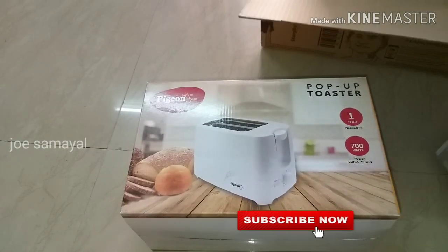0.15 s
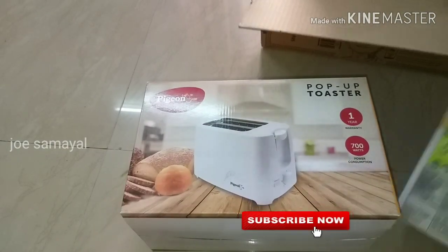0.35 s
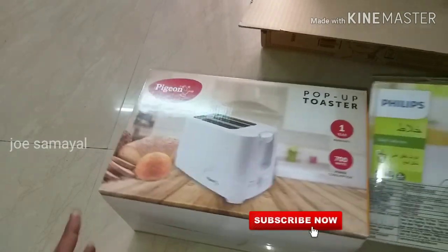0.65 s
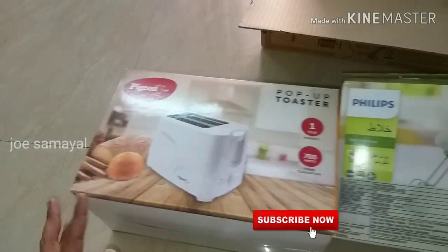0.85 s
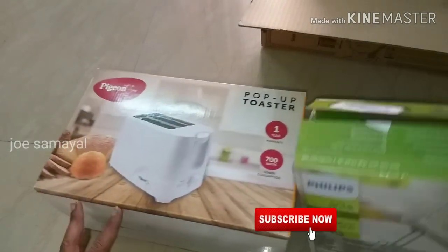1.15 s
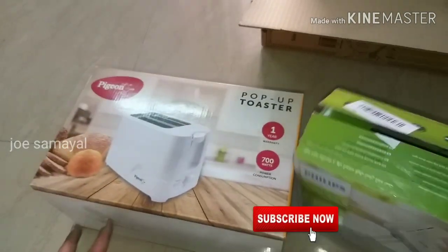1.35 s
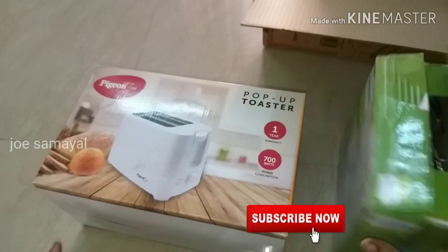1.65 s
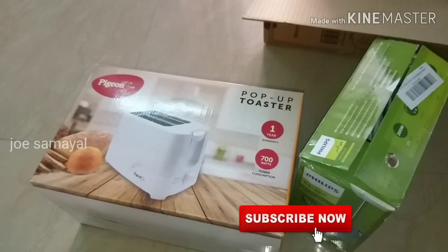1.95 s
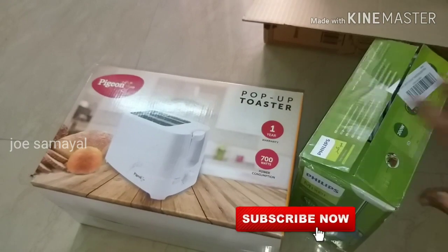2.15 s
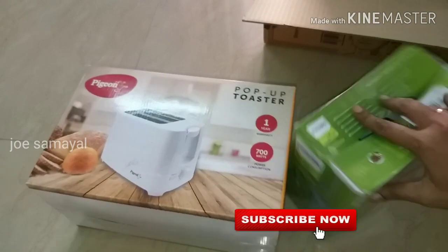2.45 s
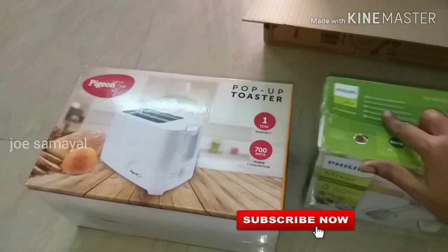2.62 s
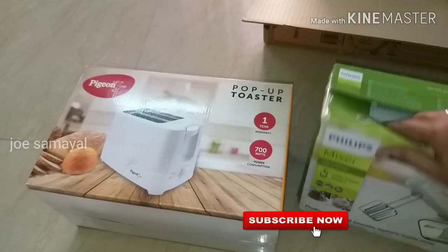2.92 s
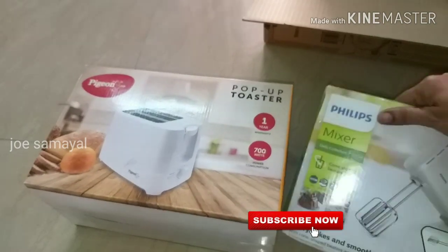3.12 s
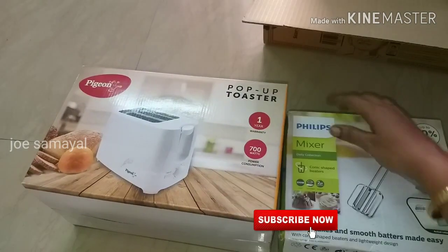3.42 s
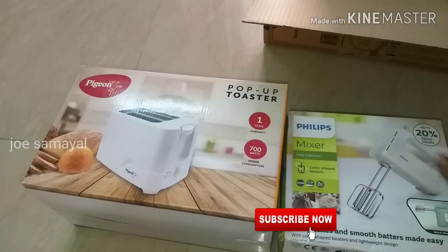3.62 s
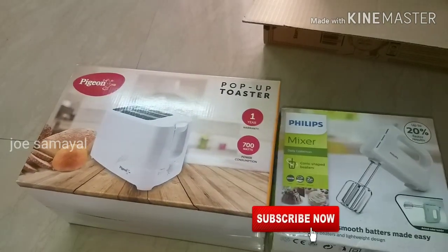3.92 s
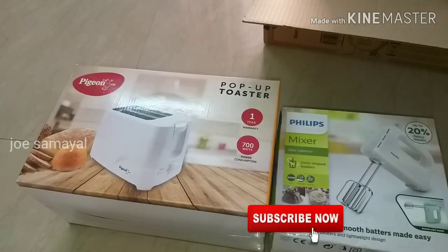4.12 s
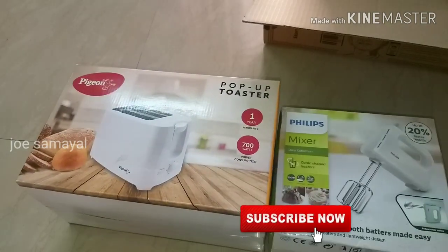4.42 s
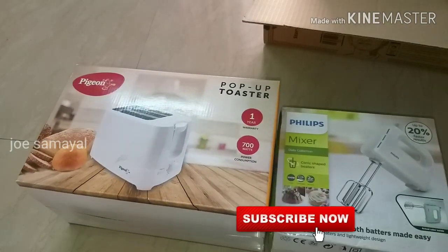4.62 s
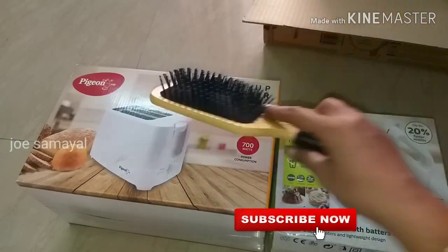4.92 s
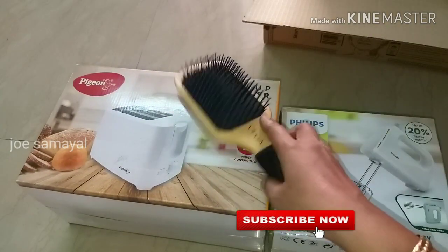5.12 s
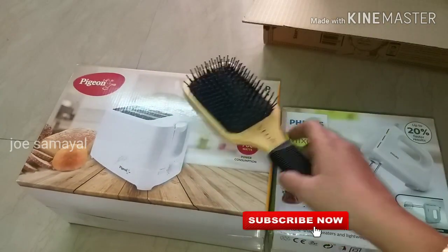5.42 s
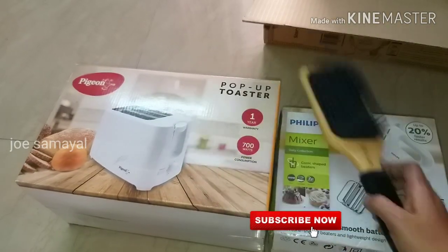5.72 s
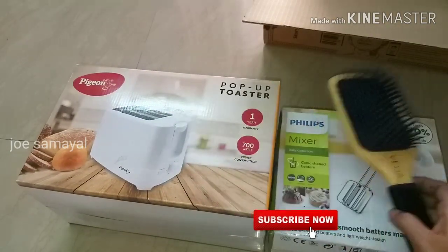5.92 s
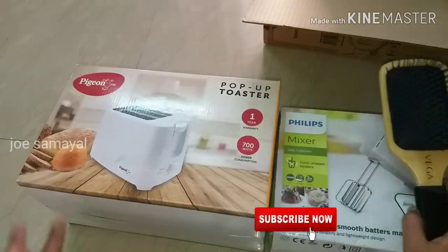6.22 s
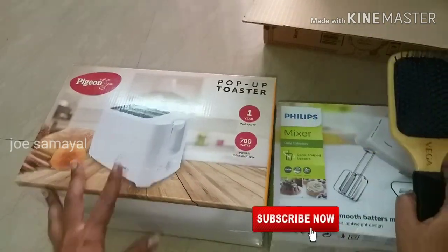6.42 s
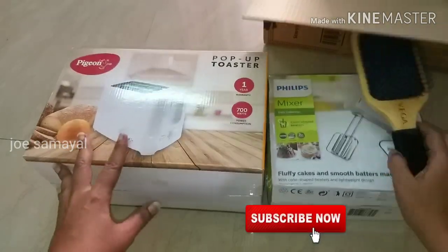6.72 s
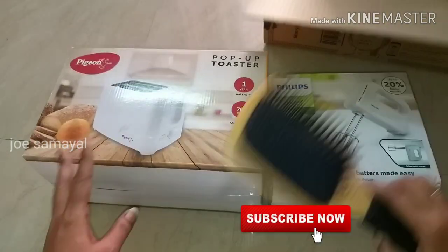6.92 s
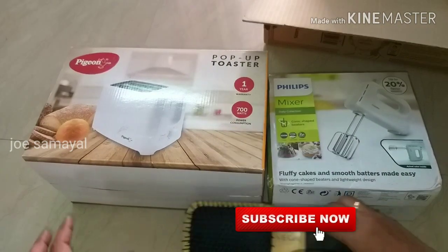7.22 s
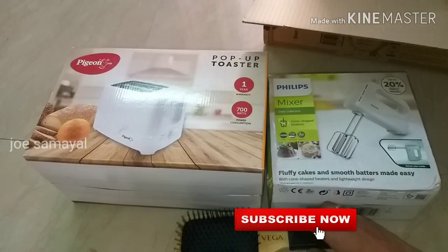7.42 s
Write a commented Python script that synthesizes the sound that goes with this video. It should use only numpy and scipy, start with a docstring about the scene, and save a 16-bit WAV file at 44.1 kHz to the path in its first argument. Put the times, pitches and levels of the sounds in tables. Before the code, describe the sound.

A nearby microphone catches dry cardboard friction on hard tiles, broken by bright ticks and boxy knocks, busiest in the first three and a half seconds. Thin steel parts rattle faintly within a box. Things go nearly silent, then come hard wooden clicks, one loud rap on card, and another gritty scrape before a hairbrush drops and rocks to rest. The bare room adds a short live echo over low hum.

```python
"""Hissing and rasping edges are heard first, as two cardboard cartons are pushed, turned and tipped on tiles.
Friction is shaped noise with gliding groans; flaps tick, card slaps and hollows boom as struck bodies.
Steel beaters jingle inside one carton as damped sines. A wooden hairbrush is picked up, rapped on a carton
(a faint squeal, a tone fraying into noise, follows) and laid on the floor with a clatter of wooden modes.
A bare room answers with diffuse decaying noise and standing waves, over quiet air and a faint motor hum."""
import sys
import numpy as np
from scipy import signal
from scipy.fft import rfft, irfft, next_fast_len
from scipy.io import wavfile
from scipy.ndimage import uniform_filter1d, map_coordinates

SR = 44100
rng = np.random.default_rng(int(sys.argv[2]) if len(sys.argv) > 2 else 0)


def output_pcm(signal):
    """Save a mono or channel-first signal as 16-bit PCM at the path in sys.argv[1].

    Samples are clipped to [-1, 1] before scaling.
    """
    pcm = np.clip(np.atleast_2d(signal).T, -1, 1) * 32767
    wavfile.write(sys.argv[1], SR, np.round(pcm).astype(np.int16))


N = 333396
HIT = 4096  # samples in one impulse response
TOP_HZ = 15650  # upper band limit

# All event and mode levels are relative: each source adds its own layer gains.
# Long slides over the tiles, one curve each.
# Each row: time in seconds, hiss of the face in dB, rasp of the edge in dB.
SLIDES = [
    [(0, -46, -46), (0.09, -49.5, -50.5), (0.16, -41, -47.5), (0.22, -44, -52.5), (0.255, -53.5, -49.5),
     (0.32, -56, -53), (0.38, -62, -69)],
    [(0.54, -46.5, -50), (0.6, -54.5, -53.5), (0.67, -53, -54.5), (0.78, -49.5, -53), (0.9, -47.5, -53.5),
     (1.12, -44.5, -50.5), (1.29, -52, -53), (1.38, -48, -52.5), (1.49, -42.5, -53)],
    [(2.39, -51.5, -49), (2.425, -41.5, -39.5), (2.52, -36.5, -43), (2.595, -37, -45.5), (2.63, -41, -43),
     (2.7, -44, -47.5), (2.75, -55.5, -57), (2.8, -65.5, -61)],
    [(3.77, -57.5, -65), (3.84, -58.5, -58), (3.92, -49.5, -55), (3.99, -57.5, -60.5), (4.08, -79.5, -83.5)],
    [(6.27, -77, -75), (6.32, -58.5, -58.5), (6.41, -58.5, -63), (6.49, -43.5, -47), (6.69, -41.5, -49),
     (6.74, -47, -48), (6.81, -41, -34), (6.86, -57.5, -53), (6.97, -74.5, -77)],
]
# Short scuffs as a carton or the brush is nudged, tipped or gripped.
# Each row: start in seconds, length in seconds, hiss in dB, rasp in dB, rumble in dB.
SCUFFS = [(0.0, 0.094, -56, -59, -48.5), (0.383, 0.052, -43.5, -51.5, -53), (.47, 0.048, -46.5, -45, -46),
          (0.683, 0.11, -51.5, -58.5, -55.5), (0.906, 0.039, -55.5, -66, -53),
          (1.157, 0.029, -41.5, -44.5, -55), (1.496, 0.056, -35.5, -36.5, -46),
          (1.537, 0.12, -39.5, -45, -52.5), (1.687, 0.046, -35.5, -41, -43.5),
          (1.739, 0.08, -42.5, -46, -47), (1.868, 0.046, -49, -47, -40.5),
          (2.296, 0.066, -46, -56.5, -40.5), (2.801, 0.048, -56, -53, -50.5),
          (2.943, 0.062, -42, -40.5, -43), (3.061, 0.071, -53.5, -68, -59.5),
          (3.104, 0.069, -43, -47, -49.5), (3.183, 0.15, -53, -54, -64), (3.338, 0.07, -44.5, -50.5, -45),
          (3.41, 0.057, -45.5, -44, -37.5), (3.774, 0.092, -75.5, -67, -51),
          (4.589, 0.14, -68, -90.5, -80.5), (5.044, 0.064, -69, -46.5, -40.5),
          (5.435, .03, -63, -62.5, -80), (5.785, 0.043, -59, -61.5, -46), (6.421, 0.061, -55, -73, -57.5),
          (7.294, 0.045, -54.5, -42.5, -48)]
# Corners groan and squeak as the cartons pivot.
# Each row: start in seconds, length in seconds, pitch in Hz, glide in Hz per second, level in dB.
GROANS = [(0.388, 0.1, 720, 200, -60.5), (.6, 0.12, 834, -2, -64), (1.2, 0.04, 760, -500, -60),
          (1.25, .018, 900, -1000, -54), (1.303, .042, 733, 1000, -51.5), (1.43, 0.058, 802, -300, -57),
          (1.7, .025, 1620, -2000, -50), (1.738, 0.0194, 5000, -3000, -47),
          (1.803, 0.025, 1600, -36000, -49.5), (2.402, 0.021, 3260, -3500, -45)]
# The sharpest snaps of the flaps. Each row: start in seconds, level in dB.
TICKS = [(0.0683, -23), (0.274, -26.5), (0.493, -22), (0.509, -16.5), (0.615, -27), (0.634, -26.5),
         (0.707, -23.5), (1.189, -17), (1.718, -14), (1.8184, -21.5), (2.311, -27.5), (2.551, -23),
         (2.583, -19), (2.9, -19.5), (6.495, -27), (6.791, -25), (6.88, -33), (7.485, -27.5)]
# Blows on the cartons.
# Each row: start in seconds, slap in dB, hollow boom in dB, panel in dB, pitch factor of the hollow.
KNOCKS = [(0.482, -48, -47, -52, 0.96), (1.189, -43, -48, -44, 1.08), (1.5138, -38.5, -43.5, -41.5, 0.7),
          (1.5279, -25.5, -41.5, -52, .9), (1.837, -28.5, -37.5, -38.5, 1.01),
          (1.902, -42.5, -46, -43, 1.33), (2.319, -26.5, -31.5, -33.5, 1.17),
          (2.328, -24.5, -40.5, -34.5, 1.05), (2.835, -24.5, -45, -39, 1.2), (2.8531, -15.5, -27, -29, 1.1),
          (2.899, -14, -30, -26, 0.95), (2.997, -34, -45, -39.5, 0.96), (3.157, -34, -64, -40, 0.89),
          (3.3472, -26, -57, -43, 0.93), (3.368, -34, -37, -49, 1.17), (3.402, -30.5, -45, -50.5, 1.17),
          (3.428, -26, -39, -36, 1.11), (3.452, -27.5, -34, -33.5, 1.41), (3.695, -46.5, -67, -72, 1.2),
          (3.7672, -46.5, -48.5, -66.5, 0.85), (5.0491, -23.5, -35.5, -44.5, 1.05),
          (5.1757, -8.5, -25.5, -26, 1.15), (5.811, -41, -39.5, -50, .85), (6.296, -38.5, -69.5, -67, 0.96),
          (6.435, -44.5, -46.5, -74, 0.86), (7.1285, -25.5, -33, -45.5, 1.24),
          (7.159, -33.5, -46, -47, 1.15), (7.197, -35.5, -41.5, -49.5, 1.05),
          (7.29, -44.5, -39.5, -43, 1.27)]
# A whole face of a carton gives way. Each row: start in seconds, level in dB, pitch factor.
THUDS = [(0.712, -46, .8), (1.771, -33, 0.63), (1.84, -39, 1.09), (5.179, -17.5, 1.04)]
# The beaters touch inside the carton. Each row: start in seconds, level in dB, pitch factor.
JINGLES = [(1.748, -41, 1.1), (1.9, -28.5, 1.04), (2.312, -40, .95), (3.452, -47, 1.12), (5.815, -52, 1.04)]
# An edge digs in and jumps free. Each row: start in seconds, level in dB.
SLIPS = [(2.559, -29), (2.568, -30.5), (2.594, -31), (6.718, -37.5), (6.729, -33), (6.753, -32.5),
         (6.767, -31.5), (6.778, -28.5), (6.803, -29), (6.8183, -30), (6.8214, -25.5)]
# The hairbrush strikes the floor or a carton. Each row: start in seconds, click in dB, handle in dB,
# handle pitch factor, paddle in dB, paddle pitch factor.
CLACKS = [(4.271, -47.5, -48.5, 1.03, -40.5, 0.8), (4.299, -46.5, -43.5, 1, -40, 0.82),
          (4.336, -16, -15, 0.98, -28.5, 0.84), (4.3465, -16.5, -19, 0.98, -32.5, 1),
          (5.0487, -30.5, -38, 0.97, -48, 1), (5.1757, -12, -17.5, 1.04, -39, 0.66),
          (7.307, -28, -46, 0.76, -27, 1), (7.323, -29.5, -41, .97, -30, 0.9),
          (7.3517, -9.5, -12, 0.99, -12.5, 0.95), (7.365, -31, -22.5, .97, -30, 1),
          (7.3731, -19, -20.5, 0.88, -17, 1), (7.451, -37.5, -37, 0.92, -30.5, 1),
          (7.458, -28, -25.5, 0.86, -32.5, 0.94)]
# A faint squeal that sinks and frays.
# Each row: time in seconds, pitch in Hz, level in dB, noisy share from 0 to 1.
SQUEAL = [(5.38, 2045, -75, .2), (5.41, 2040, -65, .2), (5.45, 2035, -60, .3), (5.47, 2060, -63, .9),
          (5.51, 2020, -62, .8), (5.57, 1980, -70, .8), (5.63, 1900, -73, .9), (5.74, 1870, -88, .9)]

# Resonances of the carton's hollow and panels, and of the brush's handle.
# Each row: centre in Hz, width in Hz, level in dB.
HOLLOW_MODES = [(167, 48, 4), (250, 97, 3.5), (367, 75, 1)]
PANEL_MODES = [(434, 130, -5.5), (731, 80, 4), (980, 81, -8.5)]
HANDLE_MODES = [(2750, 160, 6.5), (4130, 330, 6.5), (5530, 300, -3), (7300, 550, -6), (9200, 1100, -14)]
# The beaters' wires. Each row: pitch in Hz, level in dB, time to fall 60 dB in seconds.
STEEL_MODES = [(2000, -2, .08), (2830, -4, .06), (3806, -12, .06), (4620, -10, .06), (4860, -2, .06),
               (6514, -3, .06), (7950, -6, .07), (8810, 1, .07), (9496, -2, .07), (11700, -5, .06),
               (13400, -9, .05)]
# A fan motor. Each row: pitch in Hz, level in dB.
HUM = [(118.4, -72.5), (301.5, -81.5)]
# Standing waves between the walls. Each row: pitch in Hz, level in dB against the diffuse answer.
ROOM_MODES = [(166, -26), (243, -30.5), (297, -29.5), (356, -28), (420, -30.5), (738, -28)]
# Decay of the room. Each row: frequency in Hz, time to fall 60 dB in seconds.
ROOM_DECAY = [(120, 0.49), (400, 0.44), (1200, 0.44), (4000, 0.41), (8000, 0.41), (15000, 0.3)]
# Bands in which one channel is the stronger.
# Each row: centre in Hz, width in Hz, share of the gain (positive is left).
LEAN_BANDS = [(1900, 67, 0.41), (9840, 720, -0.15)]

# Spectra of friction: face, edge and panels. Each row: frequency in Hz, relative density in dB per Hz.
HISS = [(800, -23), (2500, -15), (4800, 0.5), (6500, -1), (9000, 0.5), (12000, 2), (15500, -1.5)]
RASP = [(400, -16), (850, -3), (1300, -2), (1850, 1.5), (2400, -1), (3400, -0.5), (4600, -3), (7000, -29.5)]
RUMBLE = [(30, -16.5), (70, -18), (110, -5.5), (170, -1.5), (330, 1.5), (480, -6), (750, -6), (1100, -11.5),
          (2200, -37)]
# Spectra of impact: flap, card, giving face, hard contact and hollow paddle.
# Each row: frequency in Hz, relative density in dB per Hz.
SNAP = [(400, -24.5), (1500, -14.5), (4500, 8.5), (8000, 3.5), (12000, 8), (16000, 2.5)]
SLAP = [(300, -21.5), (600, -3.5), (1000, -0.5), (1400, 2.5), (1900, 5), (2300, 0), (2800, -3), (3200, -6),
        (4100, -6.5), (5500, -15), (9000, -14.5), (15000, -22.5)]
THUD = [(30, -29.5), (60, -14.5), (110, -3), (170, 1.5), (290, -2.5), (450, -11.5), (900, -32),
        (3000, -68.5)]
CLICK = [(250, -22), (500, -5), (1000, -1.5), (1900, 1), (2300, -19.5), (3000, 1), (6000, -0.5),
         (10000, -4.5), (15000, -15)]
PADDLE = [(200, -34), (450, -13.5), (640, -20.5), (800, -7), (950, -2.5), (1050, -5), (1180, -1),
          (1320, 0.5), (1600, -13), (1870, -10), (2300, -18.5), (5000, -45.5)]
# Spectrum of the quiet room air. Each row: frequency in Hz, relative density in dB per Hz.
QUIET = [(15, -57), (25, -13), (140, 2.5), (305, -14.5), (433, -21), (509, -13.5), (631, -21), (804, -15.5),
         (945, -17), (2560, -24), (3260, -24.5), (6050, -33.5), (15500, -30.5)]

SCUFF_ATTACK_S, SCUFF_FALL_DB_PER_S, STROKE_TAIL_S = 0.02, 258.5, 0.25
RUMBLE_DB = -13  # rumble curve of a slide against its rasp curve, before the layer gains
GROAN_WANDER = 0.0506  # random pitch wander as a share of the pitch
CATCHES_PER_S = 77  # mean rate at which an edge catches and lets go
GRIT_PER_S, GRIT_DB = 7, -2.5  # mean rate of specks; mean level against the face's hiss curve
BOOM_LAG_S = 0.002  # the air inside answers after the card
# The brush rocks to rest: mean gap between contacts, first contact before layer gains, loss per contact.
ROCK_S, ROCK_GAP_S, ROCK_DB, ROCK_LOSS_DB = 7.392, 0.01, -28, 4


def amp(db):
    """Logarithmic level: decibels become an amplitude ratio."""
    return 10 ** (np.asarray(db) / 20)


def unit(x):
    """Mean power: a signal is scaled to rms 1."""
    return x / np.sqrt(np.mean(x ** 2) + 1e-20)


def along(points, hz):
    """Logarithmic frequency: (Hz, value) points are interpolated on a log axis."""
    f, v = np.transpose(points)
    return np.interp(np.log(hz + 1), np.log(f + 1), v)


def wobble(rate):
    """Band-limited fluctuation: a smooth random curve with rate knots a second."""
    knots = rng.standard_normal(int(N * rate / SR) + 4)
    return map_coordinates(knots, [np.arange(N) * rate / SR])


def filtered(x, response):
    """Linear filtering: the spectrum of x is multiplied by a response of frequency."""
    n = x.shape[-1]
    m = next_fast_len(n + 2 * HIT)
    return irfft(rfft(x, m) * response(np.fft.rfftfreq(m, 1 / SR)), m)[..., :n]


def coloured(x, spectrum):
    """Spectral shaping: x is weighted by a spectrum and brought to rms 1."""
    return unit(filtered(x, lambda hz: amp(along(spectrum, hz))))


def pulse(spectrum):
    """Minimum phase: the shortest causal pulse of a given spectrum, by folding its cepstrum."""
    cepstrum = irfft(np.log(amp(along(spectrum, np.fft.rfftfreq(HIT, 1 / SR)))))
    cepstrum[1:HIT // 2] *= 2
    cepstrum[HIT // 2 + 1:] = 0
    return irfft(np.exp(rfft(cepstrum)))


def ring(modes, detune, scatter_db=3.0):
    """Modal decay: damped modes, whose pitches and strengths vary with the point of contact."""
    t = np.arange(HIT) / SR
    out = np.zeros(HIT)
    for k, (hz, width, db) in enumerate(modes):
        sign = (-1) ** k  # neighbouring modes swing against each other
        strength = amp(db + scatter_db * rng.normal()) * width
        pitch = hz * (1 + detune * rng.normal())
        out += sign * strength * np.exp(-np.pi * width * t) * np.cos(2 * np.pi * pitch * t)
    return out


def struck(body, tail, crush, life):
    """Impact excitation: a blow and brief crushing drive a body, whose colour the room carries on."""
    fibres = rng.standard_normal(HIT) * np.exp(-np.arange(HIT) / SR / life)
    force = crush * fibres / np.linalg.norm(fibres)
    force[0] += 1
    direct = signal.fftconvolve(force, body)[:HIT]
    sound = signal.fftconvolve(body / np.linalg.norm(body), tail)
    sound[:HIT] += direct / np.linalg.norm(direct)
    return sound * np.sqrt(SR / 1000)  # direct part: the energy of 1 ms at rms 1


def room_tail(build=0.0032):
    """Reverberation: diffuse noise decaying by frequency, with standing waves, at energy 1."""
    hz, _, z = signal.stft(rng.standard_normal(SR * 3 // 4), SR, nperseg=256)
    frame_s = _
    decay = amp(-60 * frame_s / along(ROOM_DECAY, hz)[:, None])
    diffuse = signal.istft(z * decay, SR, nperseg=256)[1]
    t = np.arange(len(diffuse)) / SR
    waves = np.zeros(len(t))
    for f, db in ROOM_MODES:
        fall = amp(-60 * t / along(ROOM_DECAY, f))
        waves += amp(db) * unit(fall * np.sin(2 * np.pi * (f * t + rng.random())))
    onset = 1 - np.exp(-(t / build) ** 2)
    tail = (unit(diffuse) + waves) * onset
    return tail / np.linalg.norm(tail)


def in_room(x, wet_db):
    """Superposition of paths: direct sound plus the walls' answer."""
    path = amp(wet_db) * room_tail()
    path[0] = 1
    return signal.fftconvolve(x, path)


def add(track, s, sound):
    """Superposition in time: a sound is mixed in at s seconds."""
    part = track[max(0, round(s * SR)):][:len(sound)]
    part += sound[:len(part)]


def slide_level(column):
    """Contact envelope: gain per sample from one dB column of the slides, silent between them."""
    t = np.arange(N) / SR
    gain = np.zeros(N)
    for curve in SLIDES:
        points = np.array(curve)
        gain += amp(np.interp(t, points[:, 0], points[:, column], left=-120, right=-120))
    return uniform_filter1d(gain, size=300)


def stroke(length):
    """Transient contact: a short rub with a quick attack, a hold and a release."""
    t = np.arange(int((length + STROKE_TAIL_S) * SR)) / SR
    release = amp(-SCUFF_FALL_DB_PER_S * np.maximum(t - length, 0))
    return np.clip(t / SCUFF_ATTACK_S, 0, 1) * release


def rubbing():
    """Incoherent addition: the powers of slides and scuffs add in hiss, rasp and rumble."""
    face, edge = slide_level(column=1), slide_level(column=2)
    power = np.array([face, edge, amp(RUMBLE_DB) * edge]) ** 2
    for s, length, *levels in SCUFFS:
        for layer, db in zip(power, levels):
            add(layer, s, (amp(db) * stroke(length)) ** 2)
    return np.sqrt(power)


def friction(rate, grit, flutter_db):
    """Dry friction: countless tiny slips and larger grains (rate a second) under unsteady pressure."""
    grains = (rng.random(N) < rate / SR) * rng.standard_normal(N)
    tiny_slips = rng.standard_normal(N)
    return (tiny_slips + grit * unit(grains)) * amp(flutter_db * wobble(70))


def catches(face, edge, scatter_db=3, wet_db=-5):
    """Stick-slip of an edge: a crackle that grows as the carton tilts off its face."""
    tilt = edge ** 2 / (edge ** 2 + face ** 2)
    releases = (rng.random(N) < CATCHES_PER_S / SR) * amp(scatter_db * rng.standard_normal(N))
    crackle = struck(pulse(RASP), amp(wet_db) * room_tail(), crush=2.5, life=0.002)
    return signal.fftconvolve(releases * edge * tilt, crackle)[:N]


def groans(fuzz=0.32, flutter_db=2.5):
    """Uneven stick-slip of a corner: a fuzzy gliding tone whose width is a share of its pitch."""
    out = np.zeros(N)
    for s, length, hz, glide, db in GROANS:
        envelope = stroke(length)
        wander, drift_a, drift_b = rng.standard_normal((3, HIT))
        t = np.arange(len(envelope)) / SR
        glided = hz + glide * np.minimum(t, length)
        pitch = glided * (1 + GROAN_WANDER * map_coordinates(wander, [t * 45]))
        cycles = np.cumsum(pitch) / SR
        a = map_coordinates(drift_a, [cycles * fuzz])
        b = map_coordinates(drift_b, [cycles * fuzz])
        tone = a * np.cos(2 * np.pi * cycles) + b * np.sin(2 * np.pi * cycles)
        add(out, s, amp(db) * envelope * tone)
    return amp(flutter_db * wobble(35)) * out


def sliding(rasp_db=-2.0, rumble_db=-2.5, groan_db=5.0):
    """Sliding friction: the face hisses, edges rasp and catch, panels rumble and corners groan."""
    face, edge, panels = rubbing()
    hiss = face * coloured(friction(rate=700, grit=0.63, flutter_db=0.94), HISS)
    rasp = amp(rasp_db) * edge * coloured(friction(rate=240, grit=0.54, flutter_db=1.14), RASP)
    rumble = amp(rumble_db) * panels * coloured(friction(rate=140, grit=0.79, flutter_db=0.0), RUMBLE)
    dry_rub = hiss + rasp + rumble + amp(groan_db) * groans()
    return in_room(dry_rub, wet_db=-11.5)[:N] + catches(face, edge)


def background(air_db=-66):
    """Steady ambient noise: shaped room air and the slowly wavering tones of a motor hum."""
    t = np.arange(N) / SR
    hum = np.zeros(N)
    for hz, db in HUM:
        gain = amp(db + 1.9 * wobble(3.6)) * np.sqrt(2)  # peak from rms
        hum += gain * np.sin(2 * np.pi * hz * t + 0.4 * wobble(3.9))
    return hum + amp(air_db) * coloured(rng.standard_normal(N), QUIET)


def flap_snap(wet_db=-4):
    """Impulsive release: one bright, crushed snap with its echo."""
    return struck(pulse(SNAP), amp(wet_db) * room_tail(), crush=4.0, life=0.0026)


def ticks(tick_db=-7, scatter_db=3):
    """Impulsive release: snaps of flaps, and of grit at random moments under the slides."""
    out = np.zeros(N)
    for s, db in TICKS:
        add(out, s, amp(db + tick_db) * flap_snap())
    speck_gain = slide_level(column=1) * amp(GRIT_DB + scatter_db * rng.standard_normal(N))
    specks = (rng.random(N) < GRIT_PER_S / SR) * speck_gain
    return out + signal.fftconvolve(specks, flap_snap())[:N]


def knocks(slap_db=-4.0, boom_db=8.0, panel_db=8, wet_db=-3.0, leak_hz=105):
    """Coupled resonance: blows slap card, flex panels and boom in a hollow, with the deepest bass held back."""
    out = np.zeros(N)
    for s, slap, boom, panel, pitch in KNOCKS:
        tail = amp(wet_db) * room_tail()
        hollow = ring([(hz * pitch, width, db) for hz, width, db in HOLLOW_MODES], detune=0.027)
        flexing = ring(PANEL_MODES, detune=0.048)
        add(out, s, amp(slap + slap_db) * struck(pulse(SLAP), tail, crush=1.1, life=0.0034))
        add(out, s + BOOM_LAG_S, amp(boom + boom_db) * struck(hollow, tail, crush=0.38, life=0.012))
        add(out, s, amp(panel + panel_db) * struck(flexing, tail, crush=0.54, life=0.0056))
    return signal.sosfilt(signal.butter(2, leak_hz, "highpass", fs=SR, output="sos"), out)


def thuds(thud_db=3, wet_db=-4):
    """Volume displacement: a giving face makes one low push of air, with no ring of its own."""
    out = np.zeros(N)
    for s, db, pitch in THUDS:
        push = pulse([(hz * pitch, density_db) for hz, density_db in THUD])
        add(out, s, amp(db + thud_db) * struck(push, amp(wet_db) * room_tail(), crush=0.2, life=0.003))
    return out


def beaters(ring_db=-10, rattle_db=7, wet_db=-8):
    """Damped vibration: thin steel wires chatter, the packing damps them and the room prolongs the ring."""
    out, t = np.zeros(N), np.arange(SR // 2) / SR
    for s, db, pitch in JINGLES:
        wires = np.zeros(len(t))
        for hz, mode_db, t60 in STEEL_MODES:
            gain = amp(mode_db + rng.normal(0, 1.7) - 60 * t / t60)
            shake = map_coordinates(rng.standard_normal(250), [t * 450])  # random phase in radians
            wires += gain * np.sin(2 * np.pi * hz * pitch * t + shake)
        rattle = amp(rattle_db - 60 * t / 0.025) * coloured(rng.standard_normal(len(t)), CLICK)
        add(out, s, in_room(amp(db + ring_db) * (wires + rattle), wet_db))
    return out


def slips(wet_db=-6):
    """Stick-slip release: the strongest jumps of an edge are short, gritty bursts of its rasp."""
    out = np.zeros(N)
    for s, db in SLIPS:
        add(out, s, amp(db) * struck(pulse(RASP), amp(wet_db) * room_tail(), crush=4.0, life=0.0045))
    return out


def rocking(count=4, uneven=0.2, pitch=0.91, paddle_db=-5):
    """Energy loss at contact: ever weaker touches as the brush settles, in the columns of its strikes."""
    gaps = ROCK_GAP_S * (1 + uneven * rng.standard_normal(count))
    times = ROCK_S + np.cumsum(gaps) - gaps[0]
    levels = ROCK_DB - ROCK_LOSS_DB * np.arange(count)
    return [(s, db, db, pitch, db + paddle_db, pitch) for s, db in zip(times, levels)]


def hairbrush(handle_db=-2.5, click_db=-9, paddle_db=7.0, wet_db=-3, paddle_wet_db=-6.5):
    """Modal impact of wood: a hard click, the handle's high modes and the hollow paddle, with an echo."""
    out = np.zeros(N)
    for s, click, handle, handle_pitch, paddle, paddle_pitch in CLACKS + rocking():
        tail = room_tail()
        wet, paddle_wet = amp(wet_db) * tail, amp(paddle_wet_db) * tail
        handle_modes = [(hz * handle_pitch, width, db) for hz, width, db in HANDLE_MODES]
        stem = ring(handle_modes, detune=0.006, scatter_db=1.0)
        hollow = pulse([(hz * paddle_pitch, db) for hz, db in PADDLE])
        add(out, s, amp(handle + handle_db) * struck(stem, wet, crush=0.96, life=0.0015))
        add(out, s, amp(click + click_db) * struck(pulse(CLICK), wet, crush=5.1, life=0.0018))
        add(out, s, amp(paddle + paddle_db) * struck(hollow, paddle_wet, crush=0.7, life=0.0014))
    return out


def fray():
    """Narrow-band noise: a random envelope of rms 1 that spreads a tone into a band."""
    return unit(wobble(200) + 0.8 * wobble(650))


def squeal(flutter_db=2, wet_db=-6):
    """Loss of coherence: a soft whistling tone, clean at first, becomes an unsteady band of noise."""
    t = np.arange(N) / SR
    s, hz, db, noisy = np.transpose(SQUEAL)
    phase = 2 * np.pi * np.cumsum(np.interp(t, s, hz)) / SR
    share = np.clip(np.interp(t, s, noisy), 0, 1)
    clean = np.sqrt(2 * (1 - share)) * np.sin(phase)
    frayed = np.sqrt(share) * (fray() * np.cos(phase) + fray() * np.sin(phase))
    gain = amp(np.interp(t, s, db, left=-120, right=-120) + flutter_db * wobble(50))
    return in_room(gain * (clean + frayed), wet_db)[:N]


def scene():
    """Linear superposition: all sources add at one microphone, feeding two equal channels."""
    cartons = sliding() + ticks() + knocks() + thuds() + beaters() + slips()
    mono = cartons + background() + hairbrush() + squeal()
    return np.array([mono, mono])


def resonances(rows, hz):
    """Second-order resonance: the summed complex response of (Hz, width Hz, gain) rows."""
    return sum(g * 1j * hz * width / (centre ** 2 - hz ** 2 + 1j * hz * width) for centre, width, g in rows)


def record(dry, low_cut_hz=70):
    """Transducer limits: thinned bass, rounded peaks, slightly unlike channels and a band limit."""
    thin = signal.sosfilt(signal.butter(2, low_cut_hz, "highpass", fs=SR, output="sos"), dry)
    rounded = thin / (1 + np.abs(thin / 0.85) ** 6) ** (1 / 6)
    return filtered(rounded, lambda hz: (1 + np.outer([1, -1], resonances(LEAN_BANDS, hz))) * (hz < TOP_HZ))


dry = scene()
out = record(dry)
output_pcm(out)
```